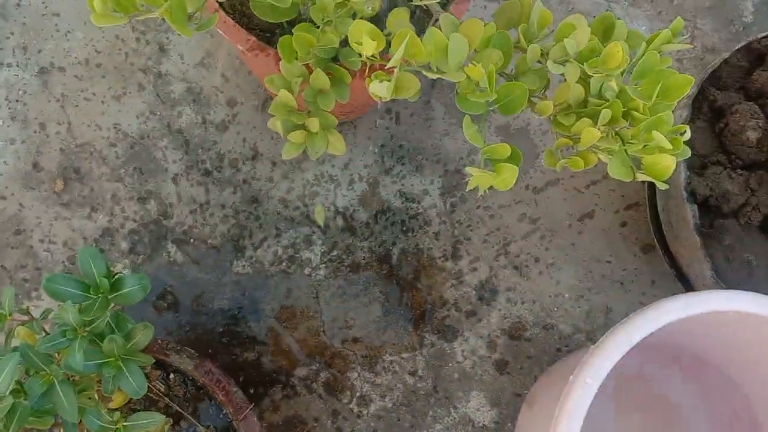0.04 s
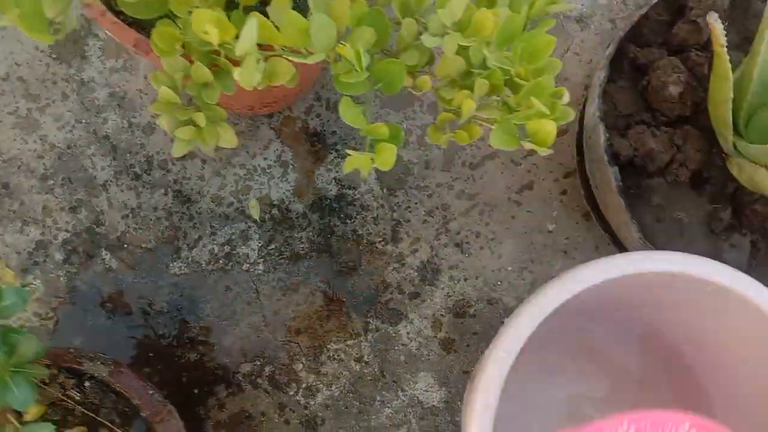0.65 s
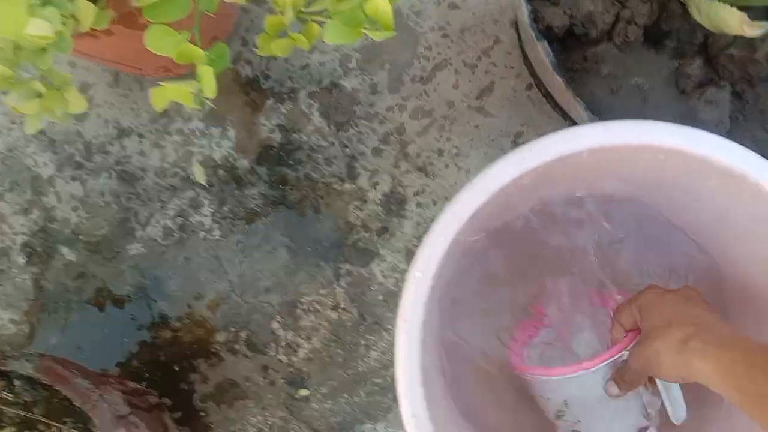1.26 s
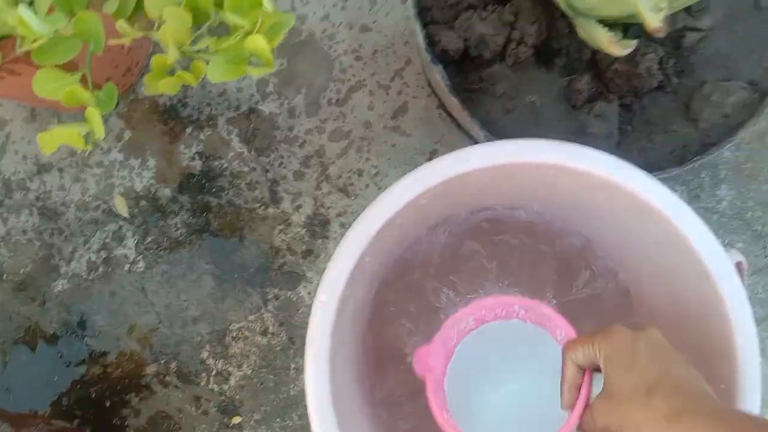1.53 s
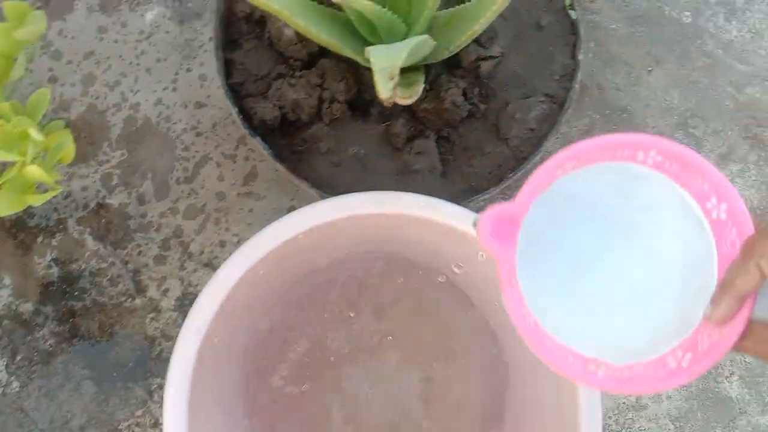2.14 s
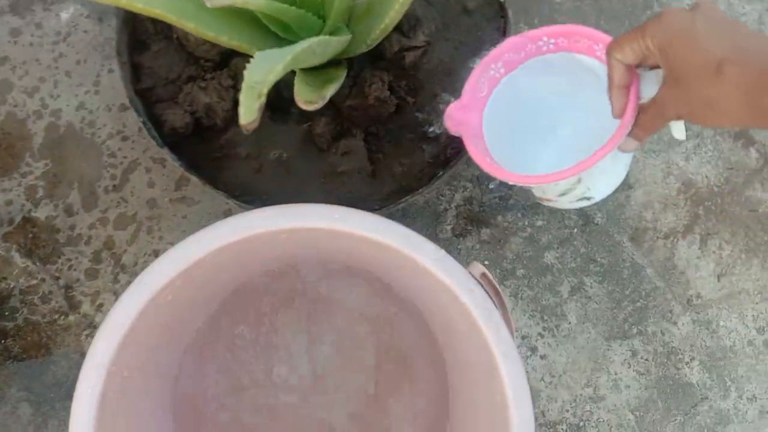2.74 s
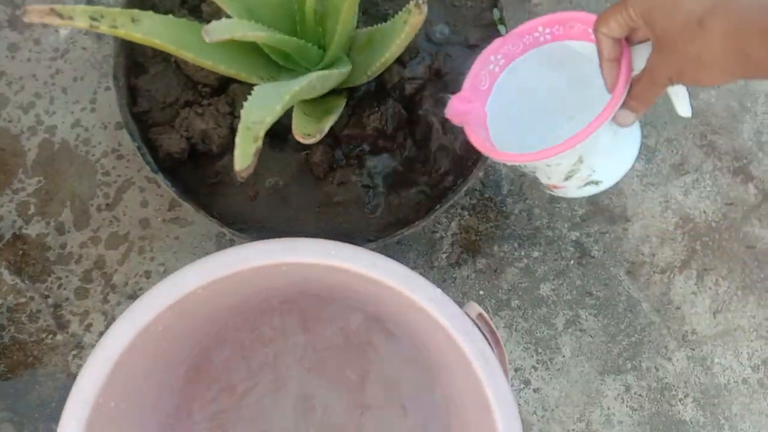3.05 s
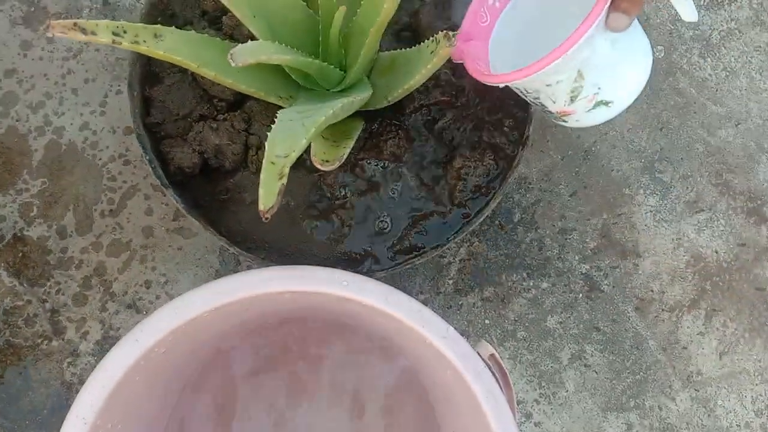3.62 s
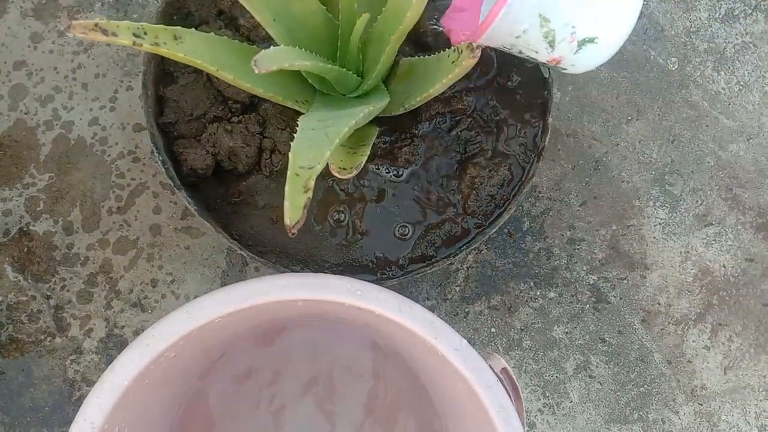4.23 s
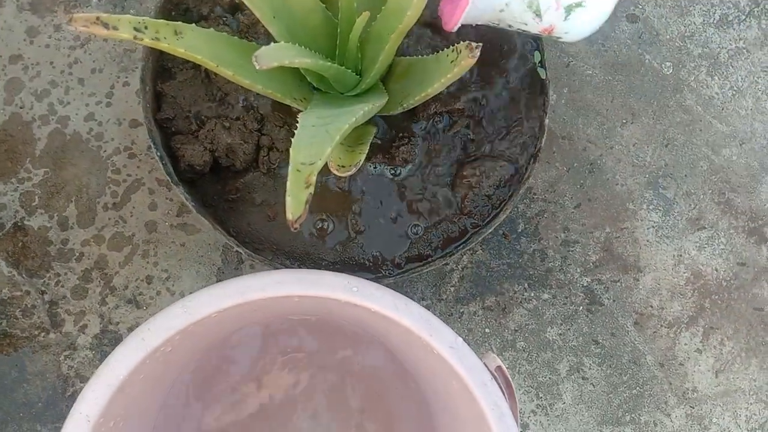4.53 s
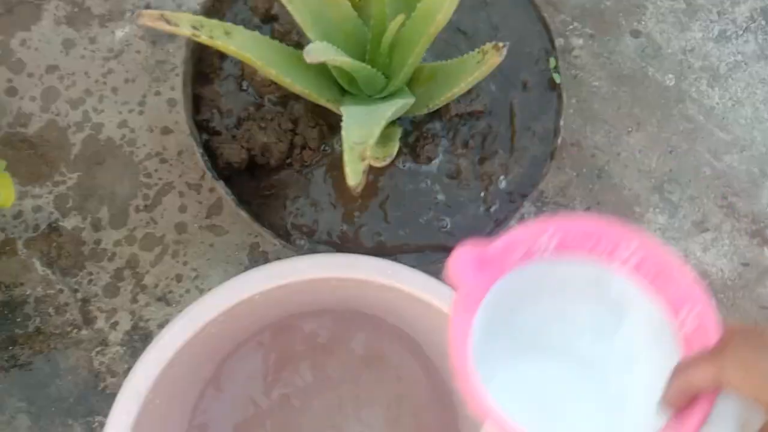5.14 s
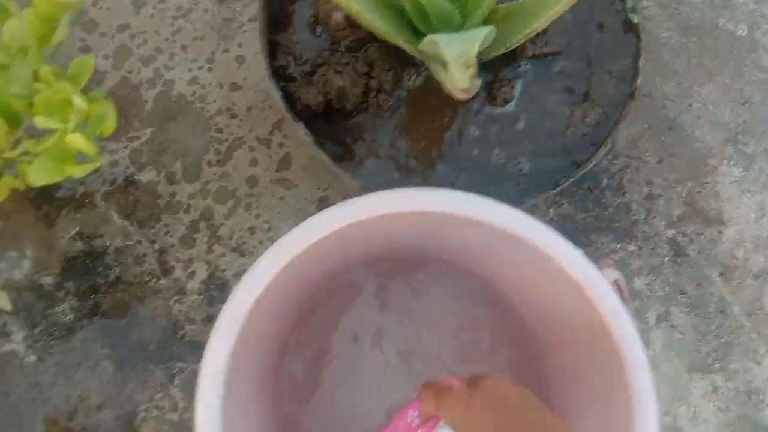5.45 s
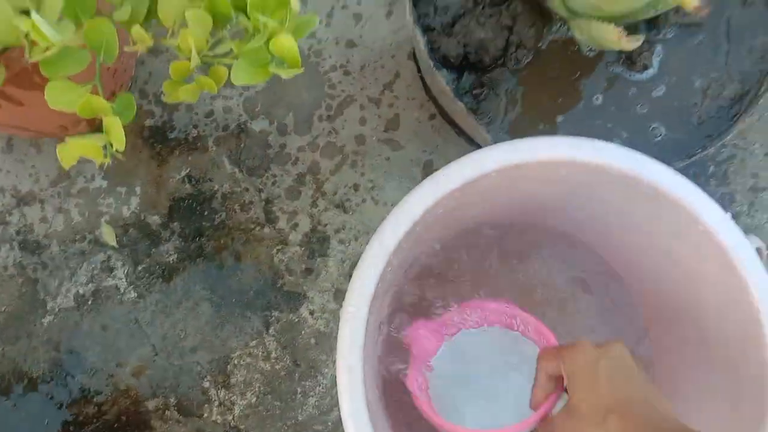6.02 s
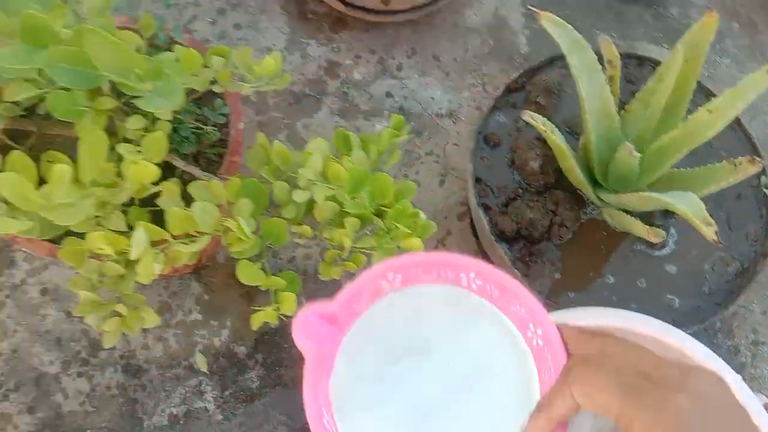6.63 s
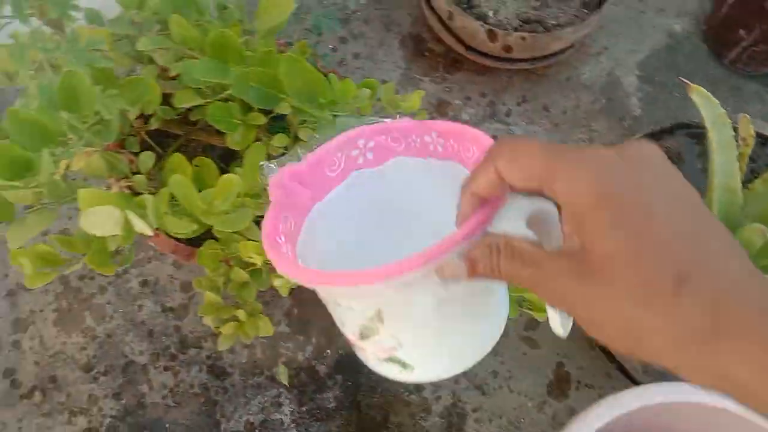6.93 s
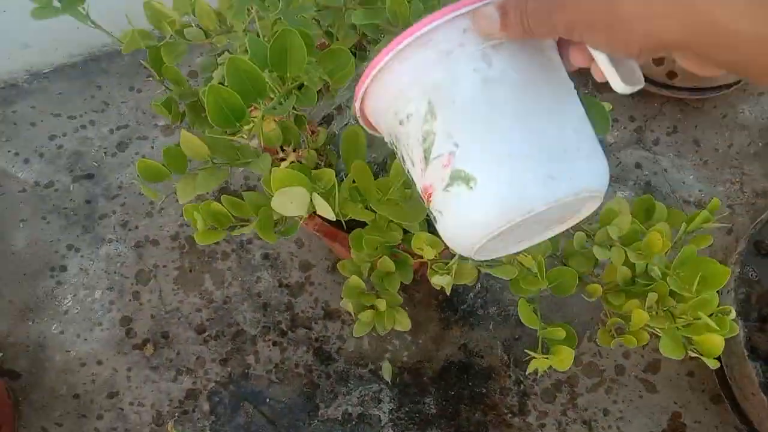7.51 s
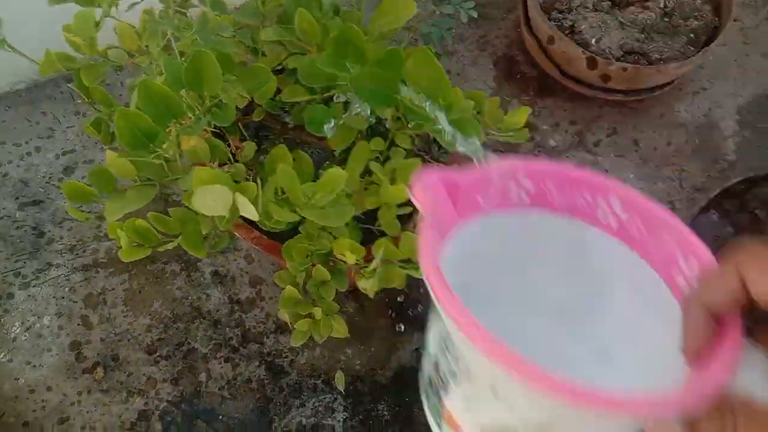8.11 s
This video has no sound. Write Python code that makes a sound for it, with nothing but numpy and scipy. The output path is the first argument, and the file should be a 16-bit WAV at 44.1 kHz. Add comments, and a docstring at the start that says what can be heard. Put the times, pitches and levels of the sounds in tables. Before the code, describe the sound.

Water patters over leaves at the start and dies away within about half a second. From 0.9 seconds a plastic mug smacks and plunges into a bucket with loud splashes, gulps and plops, then comes up streaming and dripping until about 2 seconds. From 2.8 to around 5 seconds a thin, quieter stream crackles into potted soil, growing duller as a puddle forms, with small plips and slops. At 5.5 seconds the mug plunges again, gurgling and dripping until about 6.5. From 7.2 seconds it empties over the leaves in a fine, hissing patter with some bubbling, giving out around 8.3. The water is close to a small outdoor microphone, which wind bumps with low rumbles, mostly in the first two seconds, near 5.5 and at the end. Faint bird chirps, horns and animal calls, the clearest near 5.2 seconds, sound far off over a low street hum.

```python
"""Water from a plastic mug patters over a leafy plant outdoors. The mug is dipped in a bucket, waters the
mud of a pot, is dipped again and empties over the leaves. Drops burst as tiny splashes of noise, and
trapped air rings as bubbles that gulp, gurgle and plop. Wind bumps against the small, close microphone;
birds, animal calls and horns sound far off over the hum of the street."""
import sys
import numpy as np
from scipy import signal
from scipy.fft import rfft, irfft
from scipy.io import wavfile
from scipy.ndimage import uniform_filter1d

SR = 44100
rng = np.random.default_rng(int(sys.argv[2]) if len(sys.argv) > 2 else 0)


def wav_record(signal):
    """Record a signal, one row per channel, as 16-bit PCM in the file named by sys.argv[1]."""
    frames = np.transpose(np.atleast_2d(signal))
    bounded = np.clip(frames, -1, 1)
    # unit amplitude maps onto the largest positive 16-bit level
    quanta = np.round(bounded * 32767).astype(np.int16)
    wavfile.write(sys.argv[1], SR, quanta)


N = 369116
TIME = np.arange(N) / SR

# Levels in the tables are relative: each layer has its own fader in the mix.
# tone curves: frequency_hz, gain_db
STREET_EQ = [(20, -29), (90, -2), (1600, -11.5), (5500, -24.5), (16000, -27)]  # far hum and hiss
WIND_EQ = [(20, -42.5), (55, -3), (95, 1), (200, -9), (350, -35), (800, -47.5)]  # low rumble
SPRAY_EQ = [(200, -15), (600, -9.5), (1500, 3.5), (4500, -8), (16000, -1)]  # splashes and slaps
SOIL_EQ = [(400, -0.5), (1700, 11), (3500, 3.5), (6000, 7), (10000, -1.5)]  # water crackling into soil
LEAF_EQ = [(280, -11.5), (530, 3.5), (720, -0.5), (1550, -1.5), (1950, 11), (2800, 1), (5600, -1),
           (16000, -3.5)]  # drops on leaves
MIC_EQ = [(20, -7.5), (100, 1), (2500, -4), (3100, 2.5), (5800, 2), (6800, -2.5), (8000, -18),
          (9800, -13.5), (13500, -20), (15000, -13.5)]  # the small microphone
# falling bird chirps: start_s, level_db, start_pitch_hz, upper_partial_db
BIRD_CHIRPS = [(2.214, -71, 4940, -10), (4.867, -69.5, 4900, -0.5), (6.564, -67.5, 4880, 4),
               (6.735, -65, 4080, -12), (6.819, -61, 5070, -6), (8.166, -60, 4950, -12)]
# drawn-out animal calls: start_s, length_s, level_db, pitch_hz, scoop_ratio, overtones_db, waver_ratio
ANIMAL_CALLS = [(2.061, 0.37, -64.5, 578.5, 0.27, -9.5, 0.049),
                (4.976, 0.29, -63, 1475, 0.31, -8.5, 0.0202),
                (5.211, 0.138, -52.5, 1334, 0.016, -15, 0.012)]
# far horns: start_s, length_s, level_db, pitch_hz, overtones_db
FAR_HORNS = [(2.244, 0.23, -67.5, 1128, -4), (2.806, 0.56, -67, 3234, -25), (3.568, 0.767, -68, 1263, 0.5),
             (6.722, 0.23, -75.5, 1353, 2.5)]
# spells of wind on the microphone: start_s, hold_s, level_db
WIND_SPELLS = [(0, 0.051, -47.5), (0.165, 0.0068, -39), (0.613, 0.62, -40), (1.669, 0.31, -45),
               (2.373, 0.047, -49), (2.547, 0.16, -54.5), (5.411, 0.31, -46), (5.8, 0.91, -58.5),
               (8.092, 0.36, -45)]
# the mug and fat drops smack water, mud and leaves: start_s, level_db, resonance_hz
WET_SLAPS = [(0.299, -32.5, 5600), (0.8635, -38, 1610), (0.9008, -23.5, 1600), (0.927, -33.5, 3750),
             (0.9994, -26, 5300), (1.1807, -34, 1790), (1.577, -38, 3840), (1.673, -30, 1900),
             (1.752, -36, 3640), (1.769, -28.5, 5540), (1.785, -30.5, 3220), (1.829, -33.5, 5340),
             (3.2558, -43.5, 6040), (3.379, -39.5, 1850), (4.468, -39.5, 4100), (4.757, -48.5, 4200),
             (5.5267, -29.5, 1850), (5.5372, -25, 3700), (5.673, -32.5, 2000), (5.765, -31.5, 1340),
             (5.8063, -24.5, 5370), (5.959, -30.5, 1580), (6.0437, -29, 2640), (6.128, -30.5, 3400),
             (6.278, -32.5, 6440), (6.548, -29, 3930), (7.434, -33, 1870), (7.4784, -25.5, 1970),
             (7.992, -33, 4460)]
# quick clusters of bubbles, hollow when large: start_s, level_db, middle_pitch_hz
BUBBLE_CLUSTERS = [(1.233, -30, 406), (1.603, -35.5, 3530), (1.695, -35.5, 1200), (3.154, -47.5, 1250),
                   (5.846, -36, 3440), (6.065, -35, 1670), (6.074, -40.5, 428), (6.131, -36.5, 453),
                   (6.142, -37.5, 1330), (6.303, -36, 1380), (6.351, -38, 1400)]
# large single bubbles: start_s, level_db, pitch_hz
BIG_BUBBLES = [(0.866, -25, 1620), (0.926, -25, 1154), (1.175, -15, 423), (1.184, -10, 1730),
               (1.186, -15, 2930), (1.209, -18.5, 2870), (1.248, -19.5, 380), (1.533, -24.5, 1400),
               (1.562, -26.5, 3700), (1.723, -20, 3500), (1.776, -21, 2900), (1.966, -28.5, 4200),
               (2.055, -43, 1250), (3.132, -33, 1850), (3.34, -29.5, 2330), (3.878, -31, 1710),
               (4.013, -32, 1800), (4.106, -26, 1720), (5.068, -43, 4020), (5.528, -29, 1180),
               (5.537, -19.5, 3570), (5.606, -29, 2740), (5.766, -26.5, 485), (5.791, -16, 1880),
               (5.842, -20, 1605), (5.863, -25, 356), (6.011, -22.5, 2610), (6.124, -28.5, 940),
               (7.387, -20, 2070), (7.599, -31, 563), (8.316, -42, 1310)]
# the mug digs into the bucket: start_s, splash_db, gulp_db, hold_s, fall_db_per_s
MUG_PLUNGES = [(0.899, -38.5, -35, 0.0058, 194), (1.174, -33, -42.5, 0.16, 141),
               (5.519, -42.5, -39, 0.016, 87), (5.779, -36.5, -47, 0.088, 106)]
# the full mug comes up streaming: start_s, splash_db, gurgle_db, hold_s
MUG_LIFTS = [(1.484, -37, -39, 0.18), (5.868, -40.5, -40, 0.31)]
# spurts land on the mud as the mug rocks: start_s, level_db, hold_s
MUD_SLOPS = [(2.926, -52.5, 0.21), (3.33, -61.5, 0.1), (3.528, -55, 0.11), (4.112, -51, 0.13),
             (4.454, -42, 0.014), (4.906, -67.5, 0.0058)]
# mugfuls tipped over the leaves, the first already under way: start_s, level_db
LEAF_POURS = [(-0.57, -35.5), (7.192, -36.5)]

STREAM_START_S, STREAM_HOLD_S, PUDDLE_FILL_S = 2.845, 1.56, 1.73  # the thin stream into the pot
SLOSH_DB, SLOSH_HZ = 3.5, 31  # running water comes in uneven spurts


def amp(db):
    """Decibels to gain."""
    return 10 ** (np.asarray(db) / 20)


def unit(x):
    """Scales to rms 1."""
    return x / np.sqrt(np.mean(x ** 2) + 1e-20)


def add(mix, start_s, sound):
    """Drops a sound into the mix at start_s."""
    part = mix[max(0, round(start_s * SR)):][:len(sound)]
    part += sound[:len(part)]


def colour(x, curve):
    """Minimum-phase EQ along a tone curve, so nothing rings ahead of an attack."""
    hz, db = np.transpose(curve)
    bins_hz = abs(np.fft.fftfreq(4096, 1 / SR))
    log_gain = np.interp(np.log(bins_hz + 1), np.log(hz), db) * np.log(10) / 20
    taps = np.fft.ifft(np.exp(np.conj(signal.hilbert(log_gain)))).real[:2048]
    return signal.oaconvolve(x, taps)[:len(x)]


def lowpass(x, hz):
    """Rolls off the top above hz."""
    return signal.lfilter(*signal.butter(2, hz, fs=SR), x)


def resonate(x, hz, width_hz):
    """One resonance of gain 1."""
    return signal.lfilter(*signal.iirpeak(hz, hz / width_hz, fs=SR), x)


def drift(hz):
    """A scene-long random modulator of rms 1, no faster than hz."""
    return unit(irfft(rfft(rng.standard_normal(N)) * (np.fft.rfftfreq(N, 1 / SR) < hz), N))


def tremble(hz, samples):
    """A short random modulator of rms about 1, mostly slower than hz."""
    return unit(lowpass(rng.standard_normal(SR), hz))[:samples]


def swell(start_s, rise_s, hold_s, fall_db_per_s):
    """An envelope: a rise, a hold and a steady fall in dB."""
    age = TIME - start_s
    return np.clip(age / rise_s, 0, 1) * amp(-fall_db_per_s * np.maximum(age - rise_s - hold_s, 0))


def steady(x, span_s):
    """Rides the level over span_s and keeps the finer grain."""
    window = signal.windows.hann(int(span_s * SR))
    power = abs(signal.oaconvolve(x ** 2, window / window.sum(), "same"))
    return x / np.sqrt(power + 1e-4 * np.mean(x ** 2))


def mottle(x, depth_db, size, frames):
    """Random boosts and dips over time and pitch keep the colour shifting."""
    framing = dict(nperseg=size, noverlap=size * 3 // 4)
    spectrum = signal.stft(x, **framing)[2]
    patches = uniform_filter1d(rng.standard_normal(spectrum.shape), size=frames, axis=1)
    patches = uniform_filter1d(patches, size=5, axis=0)
    return unit(signal.istft(spectrum * amp(depth_db * unit(patches)), **framing)[1][:N])


def reflections(x, t60_s):
    """Sparse echoes that die away."""
    t = TIME[:SR]
    echoes = rng.standard_normal(SR) * (rng.random(SR) < 2500 / SR) * (t > .002)
    taps = echoes * 10 ** (-3 * t / t60_s)
    return signal.oaconvolve(x, taps / np.linalg.norm(taps))[:N]


def street():
    """A bed of far hum and hiss that slowly shifts in colour."""
    return amp(-62.5) * mottle(colour(rng.standard_normal(N), STREET_EQ), depth_db=4, size=1024, frames=24)


def held_note(length_s, hz, overtones_db, waver, scoop=0, scoop_s=0.056, hoarse=False):
    """A note that wavers and flutters; it can scoop up to pitch, and hoarseness smears its overtones."""
    t = TIME[:int(length_s * SR)]
    pitch = hz * (1 - scoop * np.exp(-t / scoop_s)) * (1 + waver * tremble(35.4, len(t)))
    phase = 2 * np.pi * np.cumsum(pitch) / SR
    overtones = sum(np.sin(k * phase) * 4 / k ** 2 * (tremble(110, len(t)) if hoarse else 1)
                    for k in (2, 3, 4))
    flutter = amp(2.5 * tremble(22.2, len(t)))
    return signal.windows.tukey(len(t), .35) * flutter * (np.sin(phase) + amp(overtones_db) * overtones)


def calls_and_horns():
    """Hoarse animal calls and plainer horn notes, blurred by long echoes."""
    out = np.zeros(N)
    for s, length_s, db, hz, scoop, overtones_db, waver in ANIMAL_CALLS:
        add(out, s, amp(db) * held_note(length_s, hz, overtones_db, waver, scoop, hoarse=True))
    for s, length_s, db, hz, overtones_db in FAR_HORNS:
        add(out, s, amp(db) * held_note(length_s, hz, overtones_db, waver=0.0113))
    return amp(9.5) * out + amp(8.0) * reflections(out, t60_s=1.0)


def birds(chirp_s=.075, sweep_hz=1820):
    """Short, rough, broken chirps bend downwards; a partial a fifth above joins as each falls."""
    out = np.zeros(N)
    along = np.linspace(0, 1, int(chirp_s * SR))
    for s, db, hz, upper_db in BIRD_CHIRPS:
        fall_hz = sweep_hz * along ** (0.87 * rng.uniform(0.47, 1.3))
        pitch = (hz - fall_hz) * (1 + .017 * tremble(400, len(along)))
        phase = 2 * np.pi * np.cumsum(pitch) / SR
        breaks = unit(amp(5 * tremble(70, len(along))))
        voice = np.sin(phase) + amp(upper_db) * 2 * along * np.sin(3 * phase / 2)
        add(out, s, amp(db) * np.sin(np.pi * along) * breaks * voice)
    return amp(9.5) * out + amp(9.0) * reflections(out, t60_s=0.098)


def wind(buffet_db=7, buffet_hz=24):
    """Each spell of wind buffets the microphone in uneven puffs and rumbles away."""
    push = sum(amp(db) * swell(s, 0.02, hold_s, fall_db_per_s=172) for s, hold_s, db in WIND_SPELLS)
    rumble = colour(rng.standard_normal(N), WIND_EQ)
    return push * steady(rumble * amp(buffet_db * drift(buffet_hz)), span_s=0.45)


def impacts(per_s, spread_db):
    """Random impulses: many small, a few large."""
    size = amp(spread_db * np.minimum(rng.exponential(1, N), 4))
    return size * rng.choice([-1, 1], N) * (rng.random(N) < per_s / SR)


def splatter(per_s, spread_db, burst_s, wash, patchy_db):
    """Each droplet breaks up in a very short burst of noise, over a wash of tiny ones."""
    power = abs(signal.oaconvolve(impacts(per_s, spread_db) ** 2, np.exp(-TIME[:600] / burst_s))[:N])
    bursts = np.sqrt(power / power.mean() + wash ** 2) * rng.standard_normal(N)
    return steady(mottle(bursts, depth_db=patchy_db, size=256, frames=7), span_s=.09)


def bubble(hz, ring_s, rise):
    """A trapped bubble swells, rings and climbs in pitch as it nears the surface."""
    age = np.arange(int(10 * ring_s * SR)) / SR / ring_s
    pitch = hz * (1 + rise * (age - 1.5))
    return age * np.exp(1 - age) * np.sin(2 * np.pi * np.cumsum(pitch) / SR)


def froth(low_hz, high_hz, per_s, spread_db, cycles, sizes=24):
    """A swarm of bubbles of many sizes."""
    out = np.zeros(N)
    hits, kind = impacts(per_s, spread_db), rng.integers(0, sizes, N)
    rings = [bubble(hz, cycles / hz * (.5 + rng.random()), rise=.012)
             for hz in np.geomspace(low_hz, high_hz, sizes)]
    for i in np.flatnonzero(hits):
        add(out, i / SR, hits[i] * rings[kind[i]])
    return steady(out, span_s=.1)


def ticks(water, linger_s=0.16):
    """Tiny drips and bursting bubbles: they linger after each splash, and a few never stop."""
    keep = np.exp(-1 / (linger_s * SR))
    wetness = np.sqrt(signal.lfilter([1 - keep], [1, -keep], water ** 2)) + amp(-49.5)
    return amp(-30.5) * wetness * froth(8000, 14500, per_s=80, spread_db=4, cycles=2)


def slaps():
    """The mug or a fat drop lands: a sharp smack with one bright resonance and a short tail of spray."""
    out, t = np.zeros(N), TIME[:4000]
    envelope = (1 - np.exp(-t / .0003)) * (np.exp(-t / .0022) + amp(-21) * np.exp(-t / .014))
    for s, db, hz in WET_SLAPS:
        burst = colour(rng.standard_normal(len(t)) * envelope, SPRAY_EQ)
        smack = burst + 3.25 * resonate(burst, hz, width_hz=500)
        if STREAM_START_S < s < STREAM_START_S + STREAM_HOLD_S + 1:  # over the pot, wet soil dulls it
            smack = lowpass(smack, 7000)
        add(out, s, amp(db) * smack / np.linalg.norm(smack))
    return amp(27.0) * out


def gurgles(count=8, span_s=0.022, spread_octaves=0.88, cycles=1.9):
    """A pocket of air breaks up into a handful of bubbles of like size."""
    out = np.zeros(N)
    for s, db, hz in BUBBLE_CLUSTERS:
        cluster = np.zeros(SR // 4)
        for k, (lag, detune) in enumerate(rng.random((count, 2))):
            pitch = hz * 2 ** (spread_octaves * (detune - .5))
            ring = np.exp(-k / count) * bubble(pitch, cycles / pitch, rise=0.0087)
            add(cluster, span_s * (k + lag) / count, ring)
        add(out, s, amp(db) * np.sqrt(span_s * SR) * cluster / np.linalg.norm(cluster))
    return out


def plops():
    """The largest bubbles, one by one; the deep ones ring longest."""
    out = np.zeros(N)
    for s, db, hz in BIG_BUBBLES:
        add(out, s, amp(db) * bubble(hz, ring_s=0.0052 * (400 / hz) ** 0.85, rise=0.005))
    return out


def stirring(lift_rise_s=0.23, drain_s=0.253):
    """Splash, gurgle and gulp envelopes: sudden at each plunge, swelling and draining at each lift."""
    splashing, gurgling, gulping = np.zeros((3, N))
    for s, splash_db, gulp_db, hold_s, fall_db_per_s in MUG_PLUNGES:
        inrush = swell(s, 0.0025, hold_s, fall_db_per_s)
        splashing += amp(splash_db) * inrush
        gurgling += amp(splash_db) * inrush
        gulping += amp(gulp_db) * inrush
    spurts = amp(SLOSH_DB * drift(SLOSH_HZ))
    for s, splash_db, gurgle_db, hold_s in MUG_LIFTS:
        drained_s = s + lift_rise_s + hold_s + drain_s
        last_drips = np.exp(-np.maximum(TIME - drained_s, 0) / 0.042)
        runoff = swell(s, lift_rise_s, hold_s, fall_db_per_s=71) * last_drips
        splashing += amp(splash_db) * runoff * spurts
        gurgling += amp(gurgle_db) * runoff ** 1.1
        # the water left in the bucket rocks on and settles
        gulping += amp(splash_db - 12) * swell(s, lift_rise_s, hold_s, fall_db_per_s=53.5)
    return splashing, gurgling, gulping


def bucket():
    """The mug plunges and swallows water, then comes up streaming and dripping."""
    splashing, gurgling, gulping = stirring()
    drops = splatter(per_s=300, spread_db=3.4, burst_s=0.002, wash=0.3, patchy_db=4)
    fizz = froth(2400, 6400, per_s=300, spread_db=2.8, cycles=3)
    burble = froth(700, 2300, per_s=300, spread_db=2.4, cycles=2.5)
    gulps = froth(330.4, 643, per_s=130, spread_db=3.0, cycles=1.9)
    splash = amp(0.5) * unit(colour(drops, SPRAY_EQ)) + amp(-8.5) * fizz
    return splashing * splash + amp(-6.0) * gurgling * burble + amp(1.5) * gulping * gulps


def stream_on_mud(wobble_db=4, wobble_hz=2.6):
    """A thin stream crackles into dry soil; as a puddle forms it dulls, with small plips throughout."""
    stream = swell(STREAM_START_S, 0.013, STREAM_HOLD_S, fall_db_per_s=29)
    flow = stream * amp(-56.5 + wobble_db * drift(wobble_hz))
    flow += sum(amp(db) * swell(s, 0.0097, hold_s, fall_db_per_s=262) for s, db, hold_s in MUD_SLOPS)
    puddle = np.clip((TIME - STREAM_START_S) / PUDDLE_FILL_S, 0, 1)
    drops = splatter(per_s=300, spread_db=2.2, burst_s=0.002, wash=0.45, patchy_db=5)
    crackle = unit(colour(drops, SOIL_EQ))
    soil = amp(2.0) * (1 - puddle) * crackle + amp(-1.0) * puddle * lowpass(crackle, 4500)
    plips = froth(900, 3000, per_s=90, spread_db=3.8, cycles=3)
    return flow * (soil + amp(-3.5) * plips)


def emptying(start_s, dribble_lead_s=0.094, tip_s=0.072, empty_s=0.94):
    """Flow from a tipped mug: a dribble, then it starts quickly, holds, and gives out ever faster."""
    age = np.maximum(TIME - start_s, 0)
    dribble = amp(-24) * np.clip((TIME - start_s + dribble_lead_s) / tip_s, 0, 1)
    giving_out = amp(-10.5 * np.minimum(age / empty_s, 2) ** 4.38)
    return np.clip(age / tip_s, dribble, 1) * giving_out


def pour_on_leaves():
    """A wide stream shatters on leaves into a fine hiss; at full flow it gurgles into the pot below."""
    flow = sum(amp(db) * emptying(s) for s, db in LEAF_POURS)
    drops = splatter(per_s=600, spread_db=2.6, burst_s=0.0009, wash=0.7, patchy_db=2.3)
    bubbles = froth(980, 2040, per_s=600, spread_db=2.5, cycles=3.04)
    gurgle = unit(bubbles * amp(SLOSH_DB * drift(SLOSH_HZ)))
    return amp(2.5) * flow * (unit(colour(drops, LEAF_EQ)) + amp(-3.5) * flow / flow.max() * gurgle)


def scene():
    """Close water with the short ring of the bucket and the faint echo of the yard; far sounds and wind."""
    water = stream_on_mud() + bucket() + plops() + gurgles() + slaps()
    water = water + ticks(water) + pour_on_leaves()
    bucket_ring = amp(-14.5) * reflections(water, t60_s=0.013)
    yard_echo = amp(-12.5) * reflections(water, t60_s=0.25)
    background = birds() + calls_and_horns() + street() + wind()
    return (water + bucket_ring + yard_echo + background)[None]


def record(dry):
    """A small microphone with one ringing resonance, a dull top and a steep cut at 15.9 kHz."""
    sound = colour(dry[0], MIC_EQ)
    sound = sound + 2.9 * resonate(sound, hz=1258, width_hz=64)
    high_cut = signal.firwin(511, 15900, window=("kaiser", 9), fs=SR)
    return signal.oaconvolve(sound, high_cut, "same")[None]


dry = scene()
out = record(dry)
wav_record(out)
```